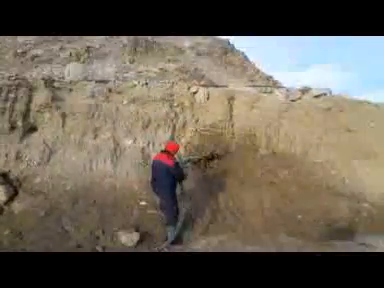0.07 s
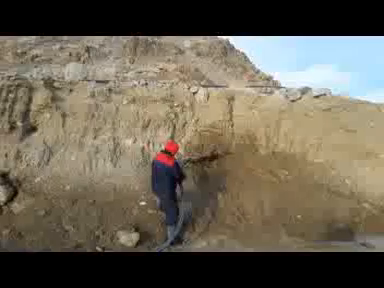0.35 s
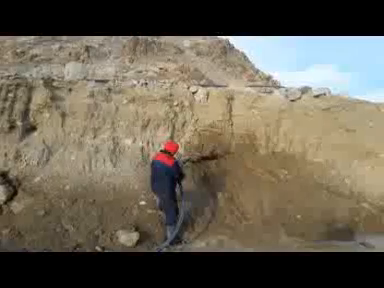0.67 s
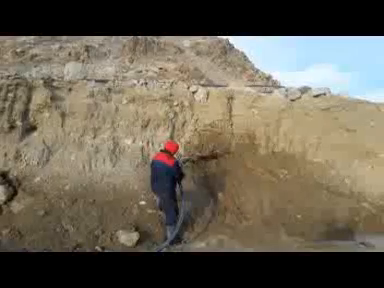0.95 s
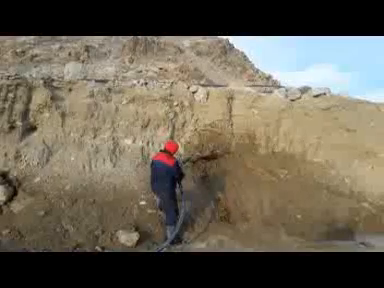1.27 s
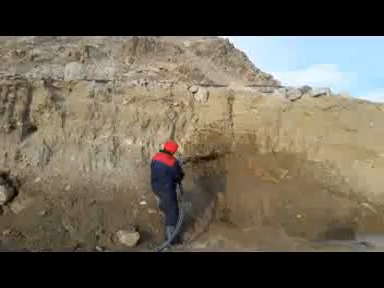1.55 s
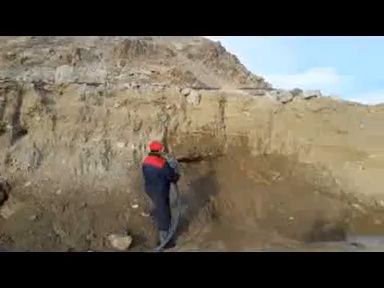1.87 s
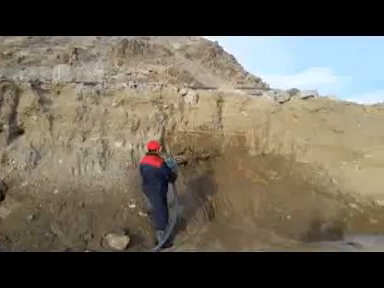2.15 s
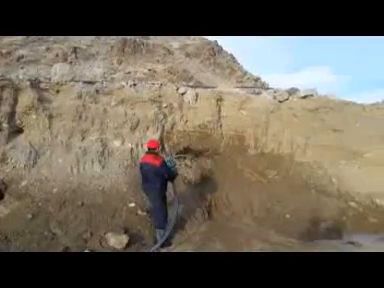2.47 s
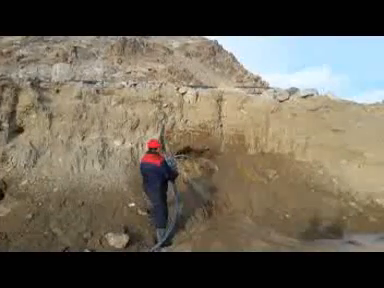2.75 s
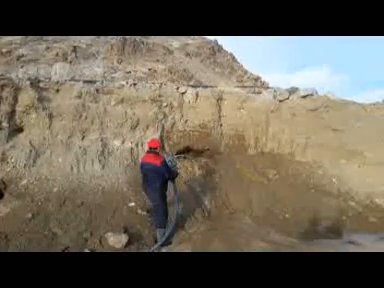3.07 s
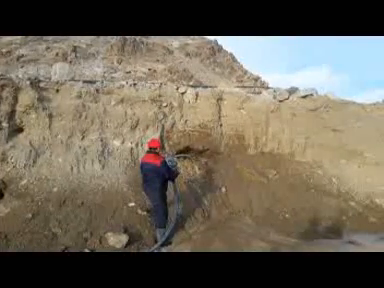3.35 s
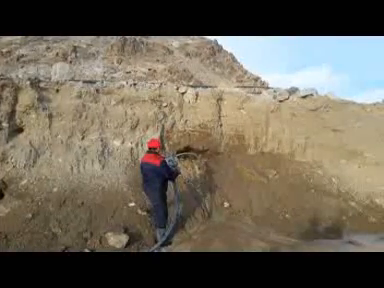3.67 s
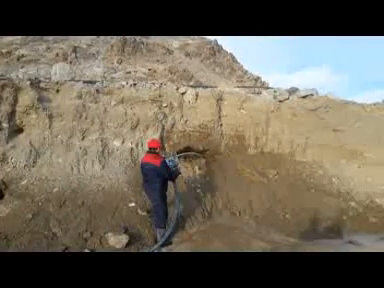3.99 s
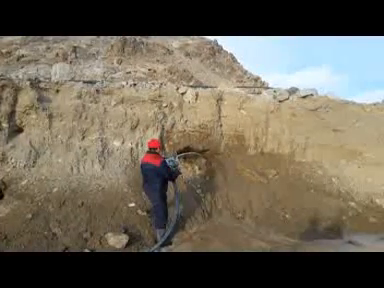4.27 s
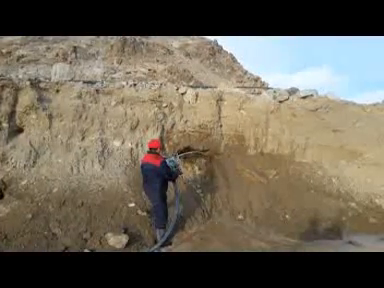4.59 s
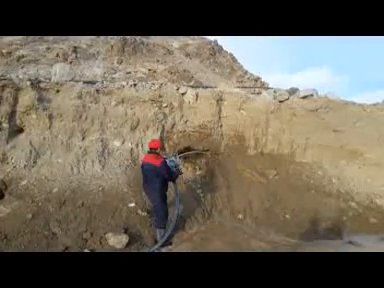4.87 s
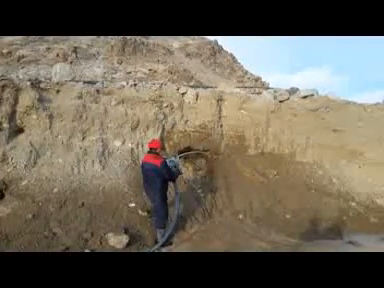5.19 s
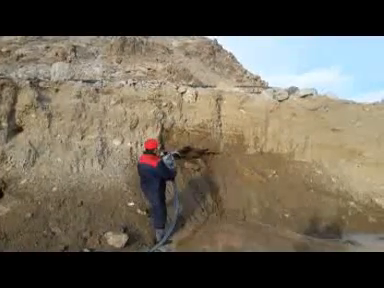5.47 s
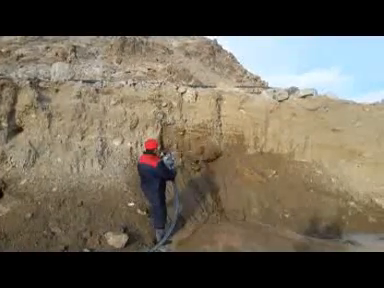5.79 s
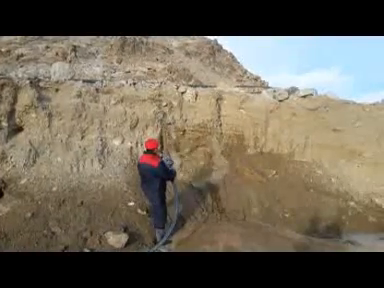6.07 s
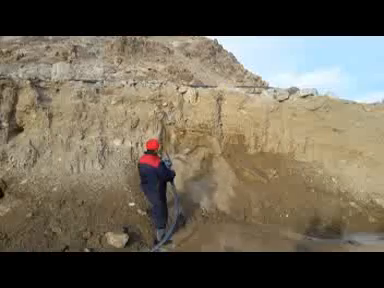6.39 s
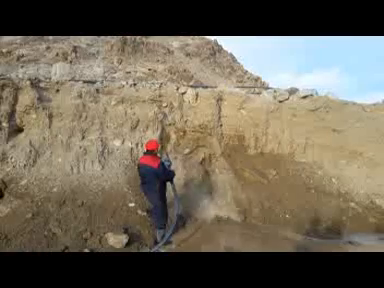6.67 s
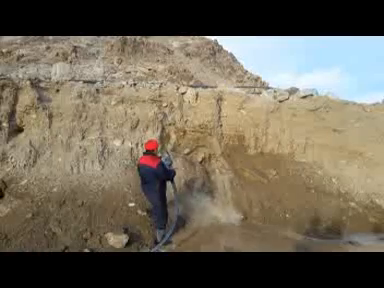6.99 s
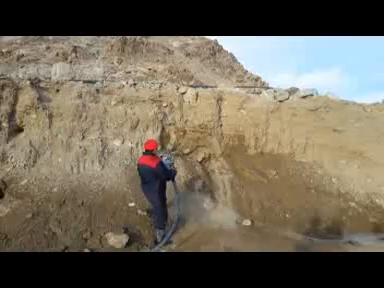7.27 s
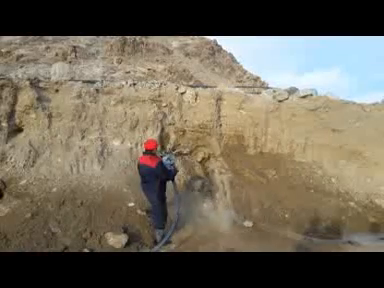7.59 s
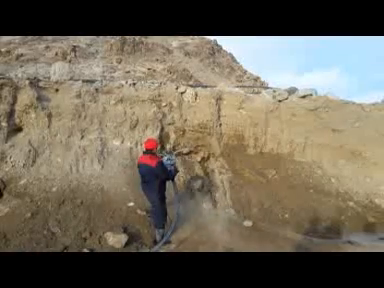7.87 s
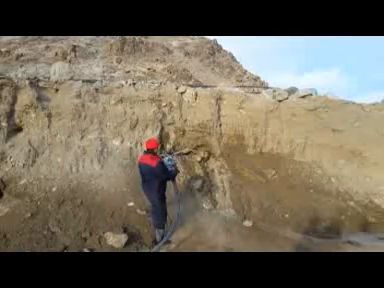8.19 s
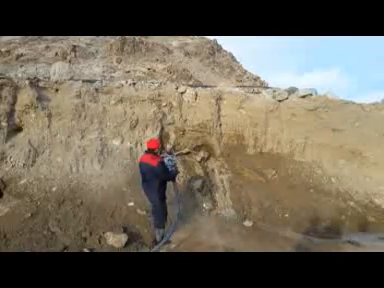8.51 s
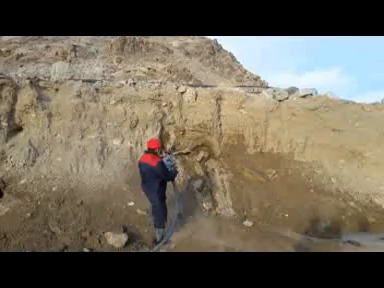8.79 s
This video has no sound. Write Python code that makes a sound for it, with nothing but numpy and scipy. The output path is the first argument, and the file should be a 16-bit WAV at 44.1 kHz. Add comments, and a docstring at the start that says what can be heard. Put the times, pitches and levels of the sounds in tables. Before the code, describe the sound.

Bright, fluttering water spray blasts a dirt face outdoors, churning loose mud while a few wind gusts rumble.

```python
"""Outdoors at an earth cliff, some metres from where a hose jet cuts into the face.
The jet breaks into slugs and droplets that hiss on the face; water churns and drums in the hollow it
digs and pounds the soil behind, and lumps of mud come loose. The rough face adds short echoes, and
drifting notches hollow out the midrange. Wind buffets the stereo microphone, mostly on the left, and
its two ports ring in the treble."""
import sys
import numpy as np
from scipy import signal
from scipy.fft import rfft, irfft
from scipy.io import wavfile
from scipy.ndimage import uniform_filter1d

SR = 44100
rng = np.random.default_rng(int(sys.argv[2]) if len(sys.argv) > 2 else 0)


def store_wav(level_fs):
    """Save 16-bit WAV to argv[1]."""
    pcm = np.round(np.clip(np.atleast_2d(level_fs), -1, 1) * 32767)
    wavfile.write(sys.argv[1], SR, pcm.T.astype(np.int16))


N = 394254
T = np.arange(N) / SR
FREQ = np.fft.rfftfreq(400000, 1 / SR)
FRAME, HOP = 1024, 256  # samples; the grid of the moving filters
BAND_HZ = np.fft.rfftfreq(FRAME, 1 / SR)[:, None]
FRAME_S = np.arange(np.ceil(N / HOP) + 1) * HOP / SR

# water shattering on the face: (frequency [Hz], relative level [dB])
SPRAY_SPECTRUM = [(600, -92), (1200, -29), (1800, -18), (2600, -19), (3400, -10), (4200, -2), (5000, 0.5),
                  (9000, 2.5), (11000, 0.5), (14500, -5.5)]
# wet mud on the move: (frequency [Hz], relative level [dB])
MUD_SPECTRUM = [(400, -54), (700, 5), (1300, 5), (2100, 3), (3200, 1), (5000, 4.5), (7000, 0), (12000, -22)]


def spray(slugs, cliff_gain):
    """Droplets shatter on the face in flurries, thicker with each slug of the jet."""
    # hiss of the jet on the face: (time [s], relative level [dB])
    jet = [(0.0, -23), (1.17, -21.5), (1.22, -24.5), (2.02, -18.5), (2.21, -21), (2.46, -18), (2.91, -21.5),
           (3.91, -19), (3.96, -22.5), (5.0, -20), (5.73, -20), (5.8, -17), (6.0, -19.5), (7.12, -25),
           (7.17, -21), (7.24, -24.5), (7.52, -24), (7.57, -27.5), (7.99, -21), (8.22, -22), (8.26, -19.5),
           (8.94, -21)]
    # where the spray flies: (time [s], leftward lean before centring and scaling [dB])
    aim = [(0.0, -5), (0.82, -6.5), (2.04, -5.5), (2.11, 1), (2.19, -7), (2.41, -2.5), (2.59, -7.5),
           (2.69, -3.5), (5.33, -7), (5.6, -8), (5.98, -6), (6.35, -10), (8.24, -5), (8.94, -5)]
    drops = impacts(rate=5000, spread_db=2.0, mist_db=0.0)
    flurries = unit(undb(0.62 * slugs + 0.9 * walk(420) + 0.27 * walk(18)))
    tone = cliff_gain * spray_tone() * waver(depth_db=2.5, width_hz=76, hold_s=0.029)
    hiss = moving_filter(from_cliff(drops * flurries, SPRAY_SPECTRUM), tone)
    lean = curve(aim) - np.mean(curve(aim))
    pan_db = np.array([0.42 * lean, -0.2 * lean])
    return hiss * undb(curve(jet) + kick_db() - 5.5 + pan_db)


def spray_tone():
    """Gain by which the body and the top of the hiss rise and fall."""
    # colour of the spray: (time [s], 4-7 kHz body [dB], top treble [dB])
    tone = [(0, -1, -0.5), (.35, 1.5, 0.5), (.9, 1, 1), (1.5, 1.5, 1), (2.1, 0, -1.5), (2.57, -1.5, -0.5),
            (2.8, 0, -3), (3.1, -.5, 0), (3.38, -0.7, -1.5), (3.8, -1.5, -2.5), (3.98, 2, 0),
            (4.2, 0.5, -1), (4.9, -0.5, -1), (5.4, -0.5, -0.5), (5.8, -2, -3.2), (6.2, -0.3, -0.5),
            (7.2, -1, -1.5), (7.73, 1.5, -2.5), (7.97, -2, -0.5), (8.27, -1.5, -1.5), (8.94, 0.5, -1)]
    body = over_hz([(2500, 0), (4000, 1), (6500, 1), (7500, 0)], BAND_HZ)
    top = over_hz([(9000, 0), (11500, 1)], BAND_HZ)
    return undb(body * curve(tone, FRAME_S) + top * curve(tone, FRAME_S, column=2))


def kick_db():
    """The jet kicks or skips, each time a short smooth bump or dip in level."""
    # kicks and skips: (time [s], length [s], change in the hiss [dB])
    kicks = [(0.36, 0.074, -3), (0.759, 0.027, -6.5), (2.56, 0.11, 1), (2.717, 0.054, 2.5),
             (3.087, 0.036, -2.5), (3.433, 0.12, 1.8), (4.017, 0.011, -7.5), (4.264, 0.12, -2),
             (5.83, 0.077, 1.5), (5.91, 0.036, 2.5), (6.043, 0.052, 1), (6.917, 0.025, -5.5),
             (7.174, 0.076, -8), (7.353, 0.018, 2), (7.617, 0.02, -6), (8.207, 0.084, -2), (8.318, 0.09, 1),
             (8.376, 0.021, -6), (8.393, 0.0092, -5)]
    return sum(db * np.exp(-(2 * (T - s) / length) ** 2) for s, length, db in kicks)


def spats():
    """A large lump of water slaps a stone now and then."""
    # water on stone: (time [s], relative peak [dB])
    hits = [(0.763, -12), (1.6576, -14), (5.1133, -19), (6.0162, -14), (6.9258, -11), (7.008, -18),
            (7.4245, -13), (7.887, -12), (8.3844, -8.5), (8.7014, -10), (8.745, -9)]
    crack = from_cliff(noise(), SPRAY_SPECTRUM)
    return crack * bursts(hits, rise_s=0.0004, decay_s=0.0018) * undb(-9.5)


def churn(slugs):
    """Coarse, gritty splashes are thrown back from the cut."""
    # water churning in the cut: (time [s], relative level [dB])
    cut = [(0.0, -41), (0.05, -36.5), (0.69, -35), (0.77, -38), (0.82, -36), (1.12, -35.5), (1.3, -37.5),
           (1.8, -37.5), (2.12, -34.5), (2.19, -36), (2.44, -34.5), (2.48, -40), (2.58, -49), (2.69, -46),
           (2.74, -35.5), (3.4, -36), (3.91, -38), (4.5, -39.5), (4.61, -35.5), (5.18, -39), (5.85, -34.5),
           (6.65, -42), (7.77, -42), (7.85, -36), (7.96, -45), (8.24, -37.5), (8.31, -48), (8.38, -40),
           (8.45, -38.5), (8.7, -37.5), (8.94, -38.5)]
    # the splashes: (frequency [Hz], relative level [dB])
    spectrum = [(200, -80), (420, -39.5), (700, -0.5), (950, -1.5), (1300, -1), (1600, 0), (2000, 1),
                (2700, -2.5), (3400, -0.5), (3800, 2.5), (5500, 0), (10000, -20.5)]
    splashes = impacts(rate=1300, spread_db=0.5, mist_db=1)
    surges = unit(undb(0.23 * slugs + 1.13 * walk(45) + 0.5 * walk(13)))
    return from_cliff(splashes * surges, spectrum) * undb(curve(cut) + 0.68 * kick_db() + 0.5)


def gushes():
    """Loosened mud gushes out of the cut, swells to a peak and drains away."""
    # mud giving way: (start [s], swell [s], decay [s], relative peak [dB])
    slides = [(2.10, 0.022, 0.035, -26.5), (2.438, 0.01, 0.0099, -28), (2.703, 0.034, 0.05, -26.5),
              (3.955, 0.027, 0.026, -32.5), (5.893, 0.0079, .016, -29), (7.795, 0.012, 0.025, -36),
              (8.25, 0.018, 0.013, -33), (8.398, 0.021, 0.065, -33), (8.532, 0.029, 0.095, -30.5)]
    flow = 0
    for s, swell, decay, db in slides:
        rise = np.clip((T - s) / swell, 0, 1)
        drain = np.exp(-np.maximum(T - s - swell, 0) / decay)
        flow += undb(db) * rise * drain
    mud = from_cliff(impacts(rate=820, spread_db=-2.5, mist_db=6), MUD_SPECTRUM)
    return mud * flow * undb(-2.0)


def hollow():
    """Slugs drum in the washed-out hollow."""
    # how hard the jet drums: (time [s], relative level [dB])
    force = [(0.0, -40.5), (0.69, -36), (0.85, -53), (1.85, -48.5), (2.13, -35), (2.46, -41.5),
             (2.57, -53.5), (2.72, -45.5), (3.26, -35.5), (3.83, -42), (4.08, -35.5), (5.5, -41.5),
             (5.77, -36.5), (5.84, -59), (5.91, -42), (6.0, -44), (6.22, -52.5), (6.3, -41), (6.67, -49.5),
             (6.8, -41.5), (7.3, -41), (7.74, -36.5), (7.89, -44), (8.03, -62), (8.18, -48), (8.27, -42.5),
             (8.94, -37.5)]
    # the hollow's voice: (frequency [Hz], relative level [dB])
    spectrum = [(150, -71), (280, -26), (400, -3), (520, -0.5), (650, 2), (780, 0), (1000, -4),
                (1300, -11.5), (2200, -46)]
    blows = impacts(rate=700, spread_db=1.5, mist_db=-5) * undb(1.6 * walk(28))
    return panned(from_cliff(blows, spectrum) * undb(curve(force) - 1.87), left_db=-1.15)


def pounding():
    """The jet pounds the soil behind the hollow, sinking in pitch as the hollow deepens."""
    # how hard the water pounds: (time [s], relative level [dB])
    force = [(0, -52), (.2, -52), (.3, -45), (.7, -39), (.85, -55), (1.1, -59), (1.65, -62), (1.95, -52.5),
             (3.0, -54.5), (3.3, -45), (4.5, -45.5), (5.4, -48.5), (5.9, -47), (6.85, -59.5), (7.7, -45.5),
             (8.0, -41), (8.35, -43.5), (8.94, -47)]
    # the soil's boom: (time [s], centre [Hz])
    pitch = [(0, 300), (1.8, 276), (3.2, 210), (4.4, 200), (6.0, 170), (8.94, 178)]
    # the blows ahead of that boom: (frequency [Hz], relative level [dB])
    spectrum = [(50, -74), (90, -32), (135, -5.5), (380, 10.5), (600, -37)]
    half_width_hz = 86
    boom = 1 / (1 + ((BAND_HZ - curve(pitch, FRAME_S)) / half_width_hz) ** 2)
    blows = from_cliff(impacts(rate=250, spread_db=-1.0, mist_db=-0.5), spectrum)
    thrum = unit(moving_filter(blows, boom))
    return panned(thrum * throbs() * undb(curve(force) + 0.1), left_db=0.5)


def throbs():
    """The low band swells unevenly and cuts out in brief dropouts."""
    # brief dropouts where the low band cuts out: (time [s], half length [s])
    dropouts = [(1.115, 0.03), (1.297, .018), (1.424, 0.018), (1.564, 0.012), (1.749, 0.063),
                (1.902, 0.027), (2.948, 0.036), (4.667, 0.033), (5.832, 0.034)]
    throbs_per_s, jitter, spread_db, dropout_db = 11, 0.299, 3, -37
    phase = np.cumsum(throbs_per_s * np.exp(jitter * walk(10))) / SR
    swells = unit(np.abs(np.sin(np.pi * phase)) * undb(spread_db * walk(9.8)))
    cut_out = sum(np.exp(-((T - s) / half) ** 4) for s, half in dropouts)
    return swells * undb(dropout_db * cut_out)


def mud_slaps():
    """Lumps of mud slap the face."""
    # the lumps: (time [s], relative peak [dB])
    hits = [(0.798, -34), (0.850, -32), (1.115, -29.5), (1.132, -32), (1.205, -35), (1.234, -34),
            (1.478, -32), (2.446, -31), (3.990, -32), (7.805, -32), (8.193, -43), (8.414, -33),
            (8.441, -33)]
    return from_cliff(noise(), MUD_SPECTRUM) * bursts(hits, rise_s=0.0014, decay_s=0.0072)


def clod():
    """A loosened clod lands with a dull thud."""
    # the landing: (time [s], relative peak [dB])
    hits = [(5.413, -32.5)]
    # the thud: (frequency [Hz], relative level [dB])
    spectrum = [(120, -27), (300, -2), (600, 0), (950, 4), (1400, -17), (3000, -33)]
    return from_cliff(noise(), spectrum) * bursts(hits, rise_s=0.0011, decay_s=0.0054)


def pocket():
    """Gain of the pocket the jet digs: it rings like a short pipe, shifting as it fills and empties."""
    # resonances: (centre [Hz], half width [Hz], nominal lift [dB])
    modes = [(565, 38, 1), (1303, 147, 5), (1980, 190, 3.5), (2620, 53, 2), (3170, 100, 4)]
    # how squarely the jet plays into the pocket: (time [s], factor on the lift [ratio])
    squareness = [(0, 0.55), (1.4, 0.43), (2.3, 0.15), (2.8, .6), (3.95, 1.3), (4.55, 0.11), (5.5, .05),
                  (6.4, 0.65), (7.2, 0.74), (7.85, 0.77), (8.5, 1.25), (8.94, 1.0)]
    stretch = 1 + 0.005 * at_frames(walk(6))
    lift = sum(db * np.exp(-((BAND_HZ - hz * stretch) / width) ** 2) for hz, width, db in modes)
    return undb(lift * curve(squareness, FRAME_S))


def notches():
    """Three drifting notches hollow out the midrange, at moments deepening into band dropouts."""
    # nominal notches: (time [s], first [Hz], second [Hz], depth 1 [dB], depth 2 [dB], depth 3 [dB])
    track = [(0, 448, 1045, 24, 17, 4), (.75, 420, 987, 23, 23, -0.5), (.97, 440, 1030, 44, 19, 1),
             (1.15, 450, 1045, 18, 10, 1), (1.42, 440, 1060, 27, 19, 2), (1.85, 424, 1015, 28, 28, 2),
             (2.1, 430, 1040, 18, 15, -1.5), (2.45, 437, 1030, 19, 10, 0.5), (2.65, 430, 970, 22, 28, 10),
             (2.77, 425, 957, 13, 13, 10), (2.93, 423, 964, 40, 17, 6), (3.35, 420, 974, 11, 14, 11),
             (3.6, 423, 966, 13, 14, 5), (4.45, 437, 1014, 12, 10, -3.5), (4.67, 422, 1013, 35, 27, 5),
             (4.9, 420, 1030, 14, 18, 3), (5.08, 426, 1034, 17, 34, -2), (5.6, 434, 985, 16, 17, 0),
             (5.82, 443, 990, 28, 28, 9), (6.35, 454, 986, 15, 8, 4), (6.9, 420, 1004, 15.5, 23, -1),
             (7.45, 356, 1004, 14, 7, 6), (7.78, 350, 990, 9, 8, 6), (8.0, 362, 1010, 14, 28, 15),
             (8.15, 357, 1020, 12, 18, 20), (8.45, 315, 946, 9.5, 2, 16), (8.94, 323, 975, 14, 10, 5)]
    half_width_hz = 118
    first, second, *depths = (curve(track, FRAME_S, column) for column in range(1, 6))
    sway = 1 + 0.02 * at_frames(walk(8))
    db = 0
    for k, depth in enumerate(depths):
        centre = (first + k * (second - first)) * sway
        deepening = np.exp(0.35 * at_frames(walk(11)))
        db -= depth * deepening * np.exp(-np.abs((BAND_HZ - centre) / half_width_hz) ** 3)
    return undb(db)


def face_echoes(count=6, shortest_s=0.003, longest_s=0.014, drift_s=0.00007):
    """Gain of weak echoes off ledges near the cut: they drift as the jet digs and ripple the midrange."""
    above_bass = (BAND_HZ / 900) ** 2 / (1 + (BAND_HZ / 900) ** 2)
    strength = 0.38 * above_bass / (1 + (BAND_HZ / 4800) ** 4)
    echoes = 0
    for delay in rng.uniform(shortest_s, longest_s, count):
        drifting = delay + drift_s * at_frames(2 * walk(1.8) + 0.5 * walk(10))
        echoes += np.exp(-2j * np.pi * BAND_HZ * drifting) / np.sqrt(count)
    return np.abs(1 + strength * echoes) / np.sqrt(1 + strength ** 2)


def wind():
    """Eddies hit each microphone port separately, mostly the left; hard buffets reach higher in pitch."""
    # eddies on the microphone: (frequency [Hz], relative level [dB])
    eddy_spectrum = [(20, -41), (40, -15), (60, -1.5), (120, 3), (180, 1.5), (260, -9), (420, -16),
                     (900, -31), (2500, -40)]
    # hard buffets: (frequency [Hz], relative level [dB])
    buffet_spectrum = [(20, -27), (60, -5), (120, -3.5), (260, 3.5), (450, -5), (750, -16), (1500, -31),
                       (4000, -21)]
    # single buffets: (time [s], relative peak [dB])
    buffets = [(1.965, -29), (1.989, -28.5), (2.02, -28), (2.059, -30), (2.207, -36), (2.328, -24.5),
               (2.423, -33), (2.513, -34), (2.744, -33.5), (4.768, -25.5), (4.790, -19), (4.803, -21),
               (4.816, -23), (4.829, -19.5), (4.841, -27), (4.858, -27), (4.880, -23), (4.898, -26),
               (4.920, -37), (4.957, -36), (4.992, -19.5), (5.003, -29), (5.017, -26), (5.085, -35),
               (5.219, -28), (5.253, -30), (5.276, -29), (5.303, -30), (5.322, -36), (5.388, -34)]
    flutter = undb(7.7 * np.minimum(walk(24), 0.8))
    eddies = unit(filtered(noise(), colour(eddy_spectrum)) * flutter)
    rumble = unit(filtered(noise(), colour(buffet_spectrum)))
    thumps = rumble * bursts(buffets, rise_s=0.00042, decay_s=0.0081) * undb(-7.0)
    return panned(eddies * gust_level() * undb(2.0), left_db=2.5) + panned(thumps, left_db=9.0)


def gust_level(rise_db_per_s=900, still_air_db=-112):
    """Each gust arrives abruptly, holds and fades; between them the air is almost still."""
    # gusts on the microphone: (arrival [s], hold [s], relative level [dB], fade [dB/s])
    gusts = [(0.64, 0.072, -61, 260), (1.966, 0.15, -38.5, 68), (2.3, 0.095, -40.5, 34),
             (2.72, 0.039, -44, 134), (3.073, .12, -63, 21), (3.68, 1, -51, 60), (4.764, 0.19, -34, 46),
             (5.218, 0.063, -39.5, 21), (6.13, 0.6, -54.5, 94), (7.005, 0.6, -49.5, 16)]
    power = undb(still_air_db) ** 2
    for s, hold, db, fade in gusts:
        below_db = rise_db_per_s * np.maximum(s - T, 0) + fade * np.maximum(T - s - hold, 0)
        power += undb(db - np.minimum(below_db, 100)) ** 2
    return np.sqrt(power)


def nozzle():
    """The nozzle itself hisses thinly and evenly, wherever the jet lands."""
    # nozzle hiss: (frequency [Hz], relative level [dB])
    spectrum = [(3000, -51), (7000, -11), (11000, -12), (13500, 31), (14500, -21)]
    return unit(filtered(noise(), colour(spectrum))) * undb(-41.5)


def impacts(rate, spread_db, mist_db):
    """Two unrelated showers of `rate` drops a second, uneven in size, over a mist too fine to resolve."""
    hit = rng.random((2, N)) < rate / SR
    size = undb(spread_db * np.minimum(rng.exponential(size=(2, N)), 5))
    drops = unit(hit * size * rng.choice([-1, 1], (2, N)))
    return unit(drops + undb(mist_db) * noise())


def bursts(table, rise_s, decay_s):
    """Envelope of a table of blows, each swelling quickly and dying away."""
    envelope = np.zeros(N)
    age = np.arange(SR // 5) / SR
    shape = (1 - np.exp(-age / rise_s)) * np.exp(-age / decay_s)
    for s, db in table:
        part = envelope[int(s * SR):][:len(age)]
        part += undb(db) * shape[:len(part)] / shape.max()
    return envelope


def from_cliff(pair, spectrum):
    """Colour a broad source and share it between the ports, which hear it less alike in the treble."""
    # likeness of the ports: (frequency [Hz], correlation [0-1])
    correlation = [(250, 0.64), (700, 0.83), (1300, 0.34), (2100, 0.57), (3300, 0), (4200, 0.66),
                   (5500, 0.34), (7800, 0.43), (10000, 0.08), (14000, 0.1)]
    likeness = np.clip(over_hz(correlation), 0, 0.99)
    mid, side = filtered(pair, colour(spectrum) * np.sqrt([1 + likeness, 1 - likeness]))
    return unit(np.array([mid + side, mid - side]))


def waver(depth_db, width_hz, hold_s):
    """Gain by which narrow bands swell and fade on their own, so the colour keeps shifting."""
    field = rng.standard_normal((len(BAND_HZ), len(FRAME_S)))
    for axis, span in enumerate([width_hz * FRAME / SR, hold_s * SR / HOP]):
        window = np.exp(-0.5 * (np.arange(-40, 41) / (span / 2)) ** 2)
        field = signal.fftconvolve(field, np.expand_dims(window, 1 - axis), "same")
    return unit(undb(depth_db * np.minimum(unit(field), 1)))  # gaps run deeper than peaks rise


def walk(rate):
    """Random levels held 1 / rate s and slewed; rms 1."""
    hold = max(int(SR / rate), 2)
    held = np.repeat(rng.standard_normal(N // hold + 2), hold)
    start = rng.integers(hold)
    return unit(uniform_filter1d(held[start:][:N], hold))


def noise():
    """Two unrelated channels of white noise."""
    return rng.standard_normal((2, N))


def colour(spectrum, size=8192):
    """Causal response with the given (frequency [Hz], level [dB]) magnitude."""
    magnitude = undb(over_hz(spectrum, np.fft.rfftfreq(size, 1 / SR)))
    cepstrum = irfft(np.log(magnitude))
    cepstrum[1:size // 2] *= 2  # folded for minimum phase
    cepstrum[size // 2 + 1:] = 0
    impulse = irfft(np.exp(rfft(cepstrum)))
    return rfft(impulse, 2 * (len(FREQ) - 1))


def filtered(x, response):
    """Apply a frequency response."""
    return irfft(rfft(x, 2 * (len(FREQ) - 1)) * response)[..., :N]


def moving_filter(x, gain):
    """Apply a gain that changes with frequency and time."""
    cells = signal.stft(x, nperseg=FRAME, noverlap=FRAME - HOP)[2]
    return signal.istft(cells * gain, nperseg=FRAME, noverlap=FRAME - HOP)[1][..., :N]


def panned(x, left_db):
    """Raise the left port and lower the right one by the same number of dB."""
    return x * undb([[left_db], [-left_db]])


def curve(table, times=T, column=1):
    """One column of a time table at the given times."""
    table = np.asarray(table)
    return np.interp(times, table[:, 0], table[:, column])


def over_hz(points, freq=FREQ):
    """A (frequency [Hz], value) table at the given frequencies."""
    hz, value = np.transpose(points)
    return np.interp(np.log(freq + 1), np.log(hz), value)


def at_frames(x):
    """A signal's value at each frame."""
    return np.interp(FRAME_S, T, x)


def undb(db):
    """Decibels to gain."""
    return 10 ** (np.asarray(db) / 20)


def unit(x):
    """Scale to rms 1."""
    return x / np.sqrt(np.mean(x ** 2))


def scene():
    """Slugs of the jet drive the hiss and the churn; pocket, notches and echoes colour water and mud."""
    slugs = unit(walk(120) + 1.45 * walk(45))
    cliff_gain = pocket() * notches() * face_echoes()
    slaps, thud = mud_slaps(), clod()
    splashing = churn(slugs) + gushes() + hollow() + slaps
    splashing = moving_filter(splashing, cliff_gain * waver(depth_db=6.5, width_hz=44, hold_s=0.033))
    water = nozzle() + spray(slugs, cliff_gain) + spats() + splashing
    return water + moving_filter(pounding(), cliff_gain) + thud + wind()


def record(dry):
    """Each microphone port rings in the treble; the loudest peaks are rounded, the top cut steeply."""
    # left port: (frequency [Hz], gain [dB])
    left_port = [(1000, 3), (3000, 4), (4000, -0.5), (4900, 5), (6800, -0.5), (7200, 9.5), (7600, 15),
                 (8100, 12), (8700, 8), (9500, -3.5), (11000, -3), (13000, -7.5), (14500, -21)]
    # right port: (frequency [Hz], gain [dB])
    right_port = [(1000, 0.77), (3000, 5.1), (5000, 1.24), (7000, 4.8), (7600, 7.3), (8300, 13.1),
                  (9100, 16.23), (10000, 14.3), (11000, 10.5), (12200, 8.8), (14500, 0.8)]
    # phase between the ports: (frequency [Hz], lead of the left [rad])
    lead = [(900, 0.63), (1600, -0.65), (3300, 0), (4200, 0.34), (5500, -1.5), (6700, -2.5), (7400, -5),
            (8100, -8.5), (9200, -9), (12000, -13)]
    ceiling, top_hz = 0.88, 14640
    left = undb(over_hz(left_port)) * np.exp(1j * over_hz(lead))
    right = undb(over_hz(right_port))
    ports = filtered(dry, np.array([left, right]))
    rounded = ports / (1 + (ports / ceiling) ** 8) ** (1 / 8)
    low_pass = signal.ellip(12, 0.1, 80, top_hz, fs=SR, output="sos")
    return signal.sosfilt(low_pass, rounded)


dry = scene()
out = record(dry)
store_wav(out)
```